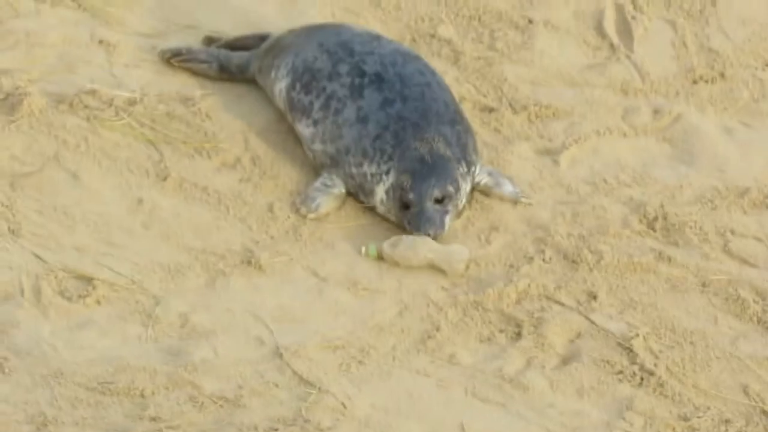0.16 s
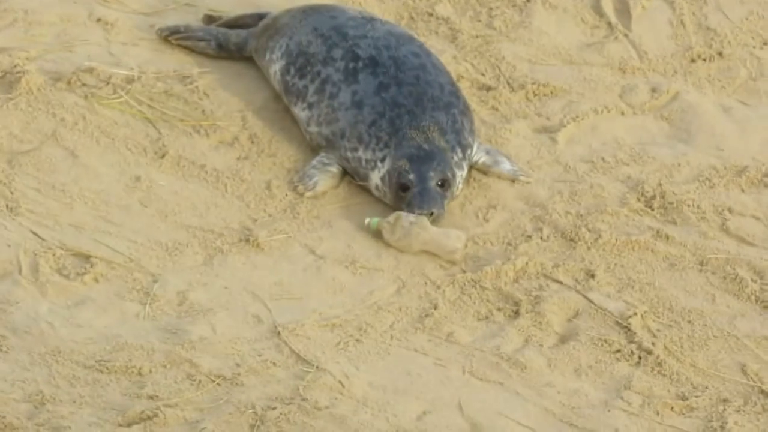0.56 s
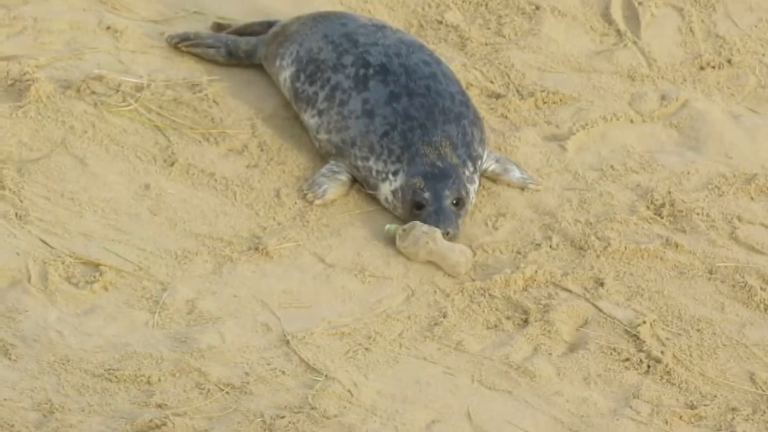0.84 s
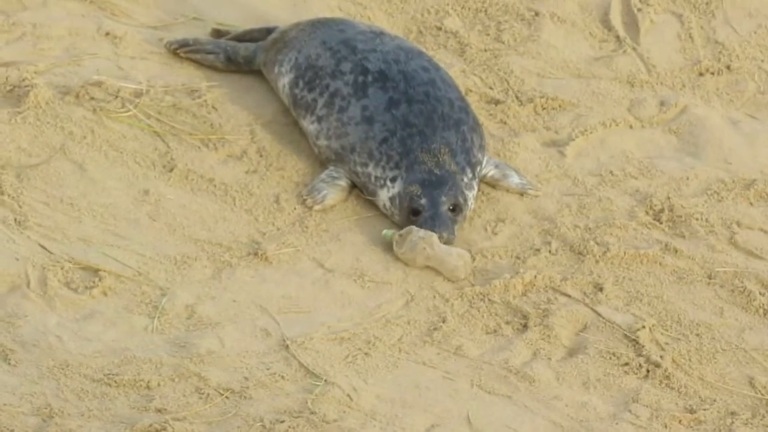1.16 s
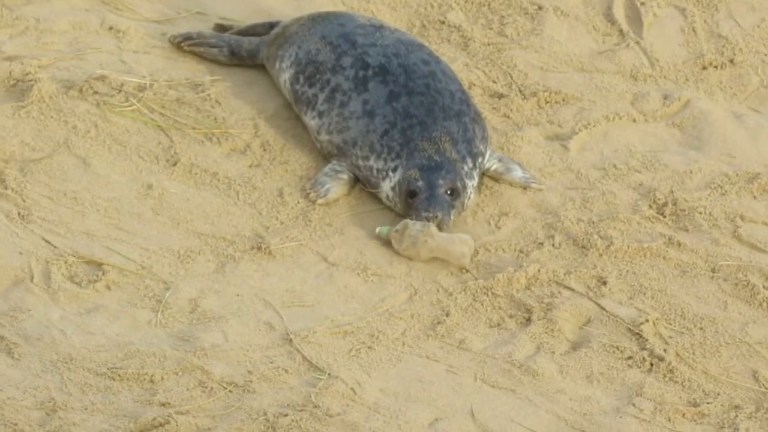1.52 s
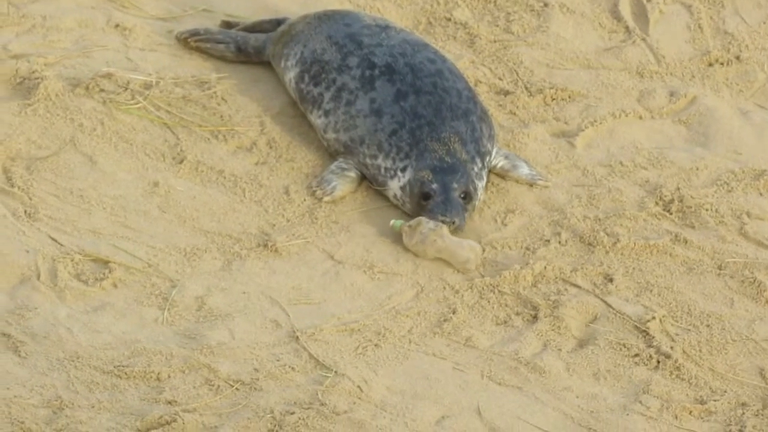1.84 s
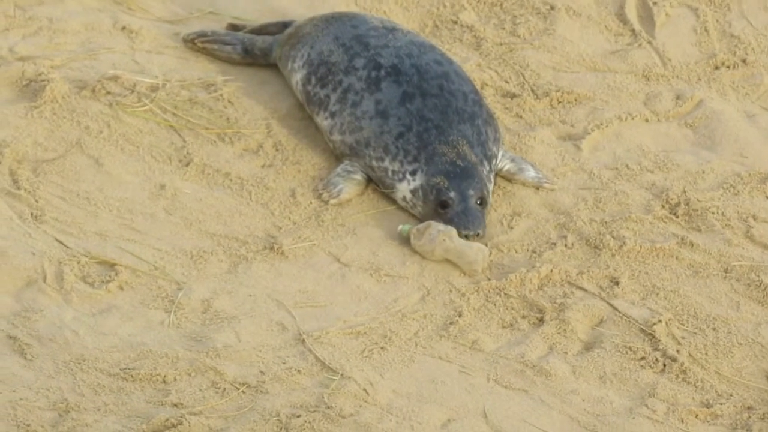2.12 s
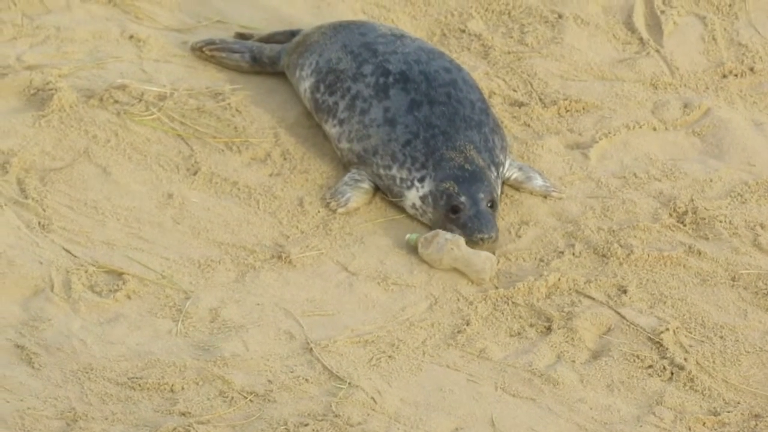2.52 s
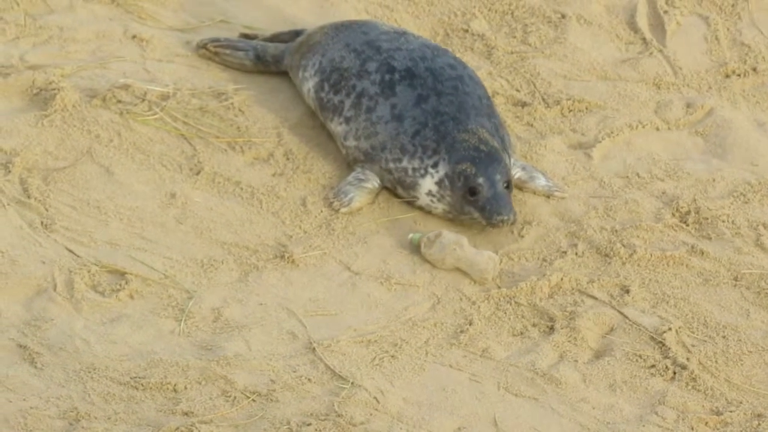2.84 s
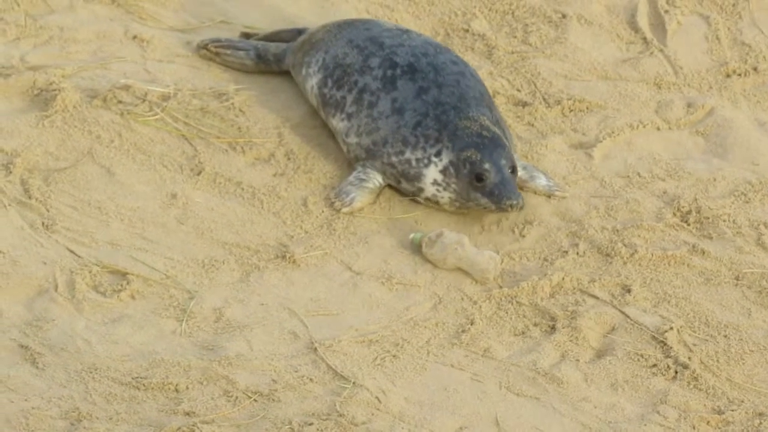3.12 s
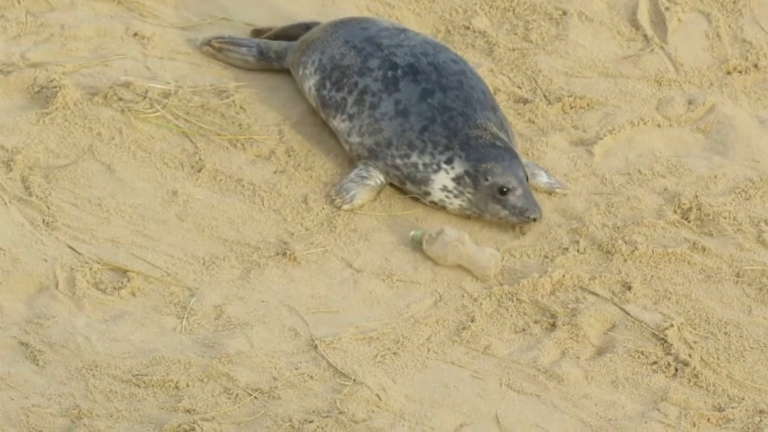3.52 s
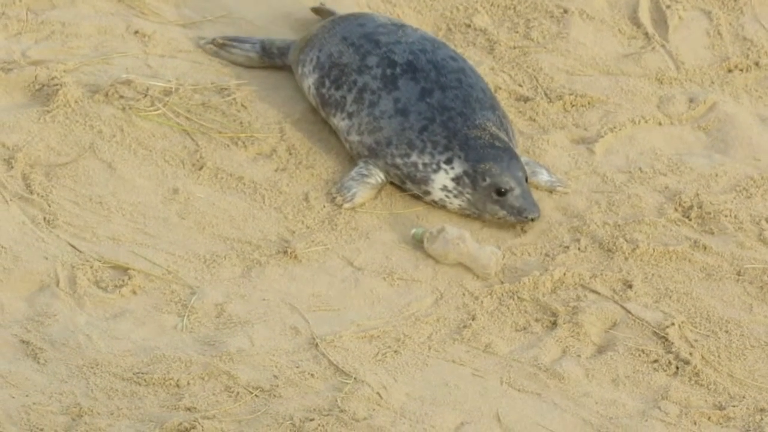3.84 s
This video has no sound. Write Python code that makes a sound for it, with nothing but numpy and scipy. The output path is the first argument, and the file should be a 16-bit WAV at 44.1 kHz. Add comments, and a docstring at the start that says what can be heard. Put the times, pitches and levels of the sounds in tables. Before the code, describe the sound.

Wind gusts buffet the microphone in lumpy low thumps, over faint surf wash on a beach

```python
"""A windy sandy beach. Gusts buffet the microphone at once: lumpy noise with single eddy thumps, its two sides opposed.
Surf washes under them, mostly on the right, with a fine hiss, probably blown sand and grass; both are churning noise.
After two seconds the gusts drop away; near 2.9 s a wave breaks, noise that builds and falls, and the surf swells.
From about 3.6 s the hiss returns, with one small tick, a short sine pulse, near 3.75 s."""
import sys
import numpy as np
from scipy import signal
from scipy.fft import rfft, irfft
from scipy.io import wavfile
from scipy.ndimage import uniform_filter1d

SR = 44100
rng = np.random.default_rng(int(sys.argv[2]) if len(sys.argv) > 2 else 0)


def unload_wav(signal):
    """Save mono or channel-first audio to the path in sys.argv[1] as 16-bit WAV at rate SR, clipped to [-1, 1]."""
    wavfile.write(
        sys.argv[1],
        SR,
        np.round(np.clip(np.atleast_2d(signal).T, -1, 1) * 32767).astype(np.int16),
    )


N = 175077
TIME = np.arange(N) / SR
BINS_HZ = np.maximum(np.arange(N // 2 + 1) * SR / N, 1)


def from_db(db):
    """Decibels to amplitude gain."""
    return 10 ** (np.asarray(db) / 20)


def rms_one(x):
    """Scale to an rms of 1."""
    return x / np.sqrt(np.mean(x ** 2) + 1e-20)


def in_time(rows):
    """Control curve at every sample, linear between rows."""
    return np.interp(TIME, *np.transpose(rows))


def at_hz(rows, hz):
    """Every column of a frequency table, read on a log frequency axis."""
    points, *columns = np.transpose(rows)
    return [np.interp(np.log(hz), np.log(points), column) for column in columns]


def drift(rate_hz):
    """Slow random curve of rms 1: noise through a two-pole lowpass at SR / 40, then interpolated."""
    step, settle = 40, 2000
    pole = np.exp(-2 * np.pi * rate_hz * step / SR)
    noise = rng.standard_normal(N // step + 2 + settle)
    slow = signal.lfilter([1], [1, -2 * pole, pole * pole], noise)[settle:]
    return np.interp(np.arange(N) / step, np.arange(len(slow)), rms_one(slow))


def wash(spectrum, image, churn_db, churn_hz):
    """Broad stereo noise whose octaves churn partly together, partly alone; rms 1 on the right."""
    level_db, = at_hz(spectrum, BINS_HZ)
    left_db, alike, lead_rad = at_hz(image, BINS_HZ)
    right, other = rfft(rng.standard_normal((2, N)))
    shared = alike * np.exp(-1j * lead_rad) * right
    left = from_db(left_db) * (shared + np.sqrt(1 - alike ** 2) * other)
    both = np.array([left, right]) * from_db(level_db)
    octave = np.clip(np.floor(np.log2(BINS_HZ / 250)), 0, 5)
    together = drift(churn_hz)
    out = 0
    for k in range(6):
        churn = from_db(churn_db * (together + drift(churn_hz)))
        out = out + irfft(both * (octave == k), N) * churn
    return out / np.std(out[1])


# Swell of the surf. Each row: time in seconds, level in dB.
SURF_SWELL = [(.07, -32), (.15, -33), (.2, -39), (.33, -36.5), (.6, -39.5), (.77, -40.5), (.98, -40),
              (1.27, -43.5), (1.6, -41.5), (2.4, -44), (2.6, -41), (2.85, -38), (3.1, -36), (3.5, -35),
              (3.75, -32.5), (3.96, -33)]
# Colour of the wash. Each row: frequency in Hz, relative density in dB per Hz.
SURF_SPECTRUM = [(25, -5), (60, 7.5), (170, -2.5), (350, 5), (600, 3), (950, 0), (1400, -1.5), (2250, -3.5),
                 (3000, -5), (3400, -13), (3800, -18), (4800, -13), (6500, -17.5), (8500, -23.5),
                 (11000, -32.5), (13000, -41), (15000, -51)]
# Stereo image of surf and breaker. Each row: frequency in Hz, left minus right in dB,
# likeness of the sides 0-1, lead of the right side in radians.
SURF_STEREO = [(200, 1, 0.8, 0.21), (537, -9, 0.5, 0.43), (890, -6, 1, 0.55), (1310, -10.5, 0.14, 4.4),
               (1600, -10.5, 0, 2.7), (2300, -13.5, 1, 4.7), (3000, -13.5, 0, 5.7), (3840, -3, 0.8, 6.2),
               (4730, -11.5, 0, 7.1), (6370, -4.5, 0.7, 7.75), (8540, -1.5, 0.8, 8.4), (11000, -1, 1, 9.7)]


def surf():
    """Steady wash of the waves: broad noise under a slow swell."""
    return from_db(in_time(SURF_SWELL)) * wash(SURF_SPECTRUM, SURF_STEREO, churn_db=.5, churn_hz=9.3)


# Colour of the breaking wave. Each row: frequency in Hz, relative density in dB per Hz.
BREAKER_SPECTRUM = [(150, -14), (400, -5), (900, 3.5), (1700, 1.5), (2600, -15), (3600, -19), (5000, -9.5),
                    (10000, -32)]
BREAK_S, BREAK_DB = 2.91, -37
BREAK_RISE_S, BREAK_FALL_S = .18, .12   # exponential time constants


def breaker():
    """One wave breaks: noise that builds exponentially to a peak and dies into the wash."""
    rise = (TIME - BREAK_S) / BREAK_RISE_S
    fall = (BREAK_S - TIME) / BREAK_FALL_S
    envelope = np.exp(np.minimum(rise, fall))
    return from_db(BREAK_DB) * envelope * wash(BREAKER_SPECTRUM, SURF_STEREO, churn_db=.4, churn_hz=23)


# Course of the hiss. Each row: time in seconds, level in dB before HISS_GAIN_DB.
HISS_COURSE = [(.07, -43.5), (.15, -44), (.19, -47.5), (.4, -46), (.7, -51.5), (.95, -50), (1.27, -60),
               (1.37, -55.5), (2.13, -55), (2.22, -61.5), (2.84, -62), (3.25, -60.5), (3.59, -51),
               (3.63, -43.5), (3.68, -41), (3.72, -46), (3.88, -45.5), (3.96, -42)]
# Colour of the hiss. Each row: frequency in Hz, relative density in dB per Hz.
HISS_SPECTRUM = [(300, 8.5), (1000, 6), (2000, 8), (3050, 2.5), (3600, -7.5), (5000, 2.5), (6500, -3.5),
                 (8500, -7.5), (11000, -13.5), (15000, -27)]
# Stereo image of the hiss. Each row: frequency in Hz, left minus right in dB,
# likeness of the sides 0-1, lead of the right side in radians.
HISS_STEREO = [(970, -1, 0.3, 0.45), (2430, -13.5, 1, -0.52), (3830, 3.5, 0.8, 0.66),
               (4700, -4, 0.88, 0.75), (8000, 0, 0.82, 0.12), (13000, -1, 0.45, -0.65)]
HISS_GAIN_DB = 4


def hiss():
    """Fine hiss, probably blown sand and grass: broad noise that comes and goes."""
    level = from_db(HISS_GAIN_DB + in_time(HISS_COURSE))
    return level * wash(HISS_SPECTRUM, HISS_STEREO, churn_db=.7, churn_hz=22)


TICK_S, TICK_DB, TICK_HZ, TICK_HALF_S = 3.7463, -26.5, 4400, .0004


def tick():
    """One small, crisp click: a sine under a Gaussian of about a millisecond, equal on both sides."""
    age_s = TIME - TICK_S
    envelope = np.exp(-(age_s / TICK_HALF_S) ** 2)
    return from_db(TICK_DB) * envelope * np.sin(2 * np.pi * TICK_HZ * age_s)


STEADY_S = .045


def evened(x):
    """Take the chance swells out of a noise, so that its strength can follow the wind; rms near 1."""
    return x / np.sqrt(uniform_filter1d(x ** 2, int(STEADY_S * SR)) + 1e-12)


# Single eddies that thump the microphone. Each row: time in seconds, strength in dB, half width in seconds.
EDDY_THUMPS = [(.101, -8, 0.0013), (.1345, 1, 0.00077), (.157, 0, .0007), (.241, -7, 0.0012),
               (.4188, -4.5, 0.00038), (.517, -2.5, 0.00097), (.552, -3.5, 0.0014), (.5954, -1, 0.00089),
               (.615, -6, 0.00065), (.675, -1.5, 0.00084), (.7257, -3, .0007), (.7455, -12, 0.0015),
               (.914, -2, .0012), (.9651, -3.5, 0.00073), (1.034, 0.5, 0.0012), (1.072, -11.5, 0.00048),
               (1.1063, -1, 0.0008), (1.1668, -6, 0.00062), (1.1791, -1, 0.00064), (1.1971, -3.5, 0.001),
               (1.2479, -5, .001), (1.2735, -5.5, 0.00082), (1.3439, -7.5, 0.00077), (1.4415, -6.5, .00065),
               (1.4529, -3, 0.00074), (1.494, -5.5, 0.00076), (1.7087, -3, 0.00095), (1.7626, -12, 0.0007),
               (2.1315, -3.5, 0.0013), (2.1435, -1, 0.00069), (2.4066, -5.5, 0.001), (2.459, -8.5, 0.00098),
               (2.8, -8, 0.0013), (2.865, -7.5, 0.0011), (2.938, -8.5, 0.0012), (2.983, -10, 0.00095),
               (3.195, -9, 0.001), (3.701, -12.5, 0.0021), (3.78, -13, 0.0019)]
SMALL_EDDY_COUNT = 100
SMALL_EDDY_DB, SMALL_EDDY_SPREAD_DB = 2, 2   # mean above the gust level, spread either way
SMALL_EDDY_WIDTH_S = .0012   # varies half an octave either way
REBOUND_SHARE, SWEPT_SHARE = .7, .75   # rebound relative to suction, turbulence swept aside


def small_eddies(gust_db):
    """Small eddies at random, one per equal slot of time, their strength following the gust."""
    eddies = []
    for slot, (offset, size, span) in enumerate(rng.random((SMALL_EDDY_COUNT, 3))):
        when = (slot + offset) / SMALL_EDDY_COUNT
        db = gust_db[int(when * N)] + SMALL_EDDY_DB + SMALL_EDDY_SPREAD_DB * (2 * size - 1)
        eddies.append((when * TIME[-1], db, SMALL_EDDY_WIDTH_S * 2 ** (span - .5)))
    return eddies


def buffeted(turbulence, gust_db):
    """Each eddy sweeps the turbulence aside with a short suction and a softer, longer rebound."""
    out = turbulence.copy()
    for peak_s, db, width_s in small_eddies(gust_db) + list(EDDY_THUMPS):
        near = slice(*np.searchsorted(TIME, [peak_s - 10 * width_s, peak_s + 10 * width_s]))
        u = (TIME[near] - peak_s) / width_s
        suction = np.exp(-u ** 2)
        rebound = REBOUND_SHARE * np.exp(-((u - 2) / 1.5) ** 2)
        out[near] *= 1 - SWEPT_SHARE * np.exp(-((u - 1) / 3) ** 2)
        out[near] += from_db(db) * (rebound - suction)
    return out


# Strength of the wind at the microphone. Each row: time in seconds, level in dB before tilt and lumps.
GUST_STRENGTH = [(.07, -13.5), (.14, -10.5), (.19, -14), (.27, -15.5), (.4, -12.5), (.52, -11), (.6, -14.5),
                 (.65, -16), (.7, -12), (.81, -9), (.85, -19), (.9, -13), (1.02, -11.5), (1.055, -19),
                 (1.09, -12), (1.22, -12.5), (1.3, -17.5), (1.4, -15.5), (1.46, -15), (1.6, -15.5),
                 (1.7, -14.5), (1.8, -12.5), (1.88, -16), (1.96, -17.5), (2.06, -15), (2.14, -13),
                 (2.25, -22.5), (2.37, -17.5), (2.52, -20.5), (2.7, -22), (2.83, -19.5), (3.1, -25.5),
                 (3.19, -20), (3.25, -28.5), (3.35, -31), (3.43, -45), (3.5, -31.5), (3.59, -24),
                 (3.63, -29.5), (3.69, -17), (3.79, -28), (3.9, -28), (3.96, -24)]
# Tilt of the upper rumble. Each row: time in seconds, slope in dB per octave.
RUMBLE_TILT = [(.07, -4), (.15, -0.5), (.25, 1.5), (.42, -1.5), (.6, 0.5), (.85, -2), (1.15, -0.5),
               (1.34, 3.5), (1.39, -2.5), (1.46, 1), (1.6, -2), (1.85, -2.5), (2.1, 0), (2.4, -0.5),
               (2.65, -6.5), (2.95, -2), (3.4, -10), (3.96, -16)]
# Colour of the rumble before tilt. Each row: frequency in Hz, relative density in dB per Hz.
RUMBLE_SPECTRUM = [(15, -35), (28, -24), (50, -5.5), (90, 3), (160, -1), (240, -5.5), (310, -9),
                   (400, -18.5), (600, -26), (950, -41), (1800, -80)]
BRIGHT_ABOVE_HZ = 158   # tilt and upper lumps act above this, growing over two octaves
LUMP_DB, LUMPS_HZ, UPPER_LUMP_DB_PER_OCTAVE = 1.77, 27, 1.5
SUCTION = .35   # eddies pull harder than they push
WIND_LEFT_DB, WIND_LIKENESS = -4.9, .91


def wind():
    """Turbulence in half-octave bands, lumpy and tilted in time, pushing the two sides oppositely."""
    gust_db, tilt_db = in_time(GUST_STRENGTH), in_time(RUMBLE_TILT)
    lumps, upper_lumps = drift(LUMPS_HZ), drift(LUMPS_HZ)
    rumble_db, = at_hz(RUMBLE_SPECTRUM, BINS_HZ)
    coloured = rfft(rng.standard_normal((2, N))) * from_db(rumble_db)
    noise = rfft(evened(irfft(coloured, N)))
    edges_hz = 15 * 2 ** (np.arange(15) / 2)
    turbulence = 0
    for low, high in zip(edges_hz, edges_hz[1:]):
        octaves_up = np.clip(np.log2(np.sqrt(low * high) / BRIGHT_ABOVE_HZ), 0, 2)
        bright_db = octaves_up * (tilt_db + UPPER_LUMP_DB_PER_OCTAVE * upper_lumps)
        band = irfft(noise * ((BINS_HZ >= low) & (BINS_HZ < high)), N)
        turbulence = turbulence + band * from_db(bright_db)
    right, other = turbulence * from_db(gust_db + LUMP_DB * lumps)
    highpass = signal.butter(2, 60, "high", fs=SR, output="sos")
    pull = signal.sosfilt(highpass, right ** 2)
    right = buffeted(right - SUCTION * pull, gust_db)
    left = np.sqrt(1 - WIND_LIKENESS ** 2) * other - WIND_LIKENESS * right
    return np.array([from_db(WIND_LEFT_DB) * left, right])


def scene():
    """Wind on the microphone over surf, a breaker, hiss and a tick."""
    return surf() + breaker() + hiss() + tick() + wind()


START_S, FADE_IN_S, CUTOFF_HZ = .06, .002, 16300


def record(dry):
    """Round off the biggest thumps, fade in quickly from silence and cut the top."""
    rounded = dry / (1 + dry ** 8) ** (1 / 8)
    opened = rounded * np.clip((TIME - START_S) / FADE_IN_S, 0, 1)
    lowpass = signal.cheby2(12, 70, CUTOFF_HZ, fs=SR, output="sos")
    return signal.sosfilt(lowpass, opened)


dry = scene()
out = record(dry)
unload_wav(out)
```